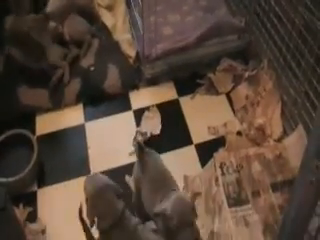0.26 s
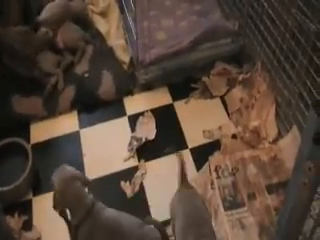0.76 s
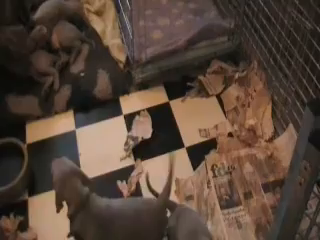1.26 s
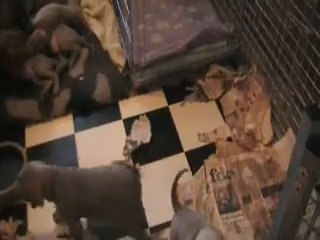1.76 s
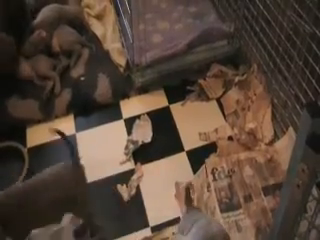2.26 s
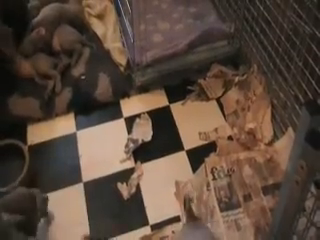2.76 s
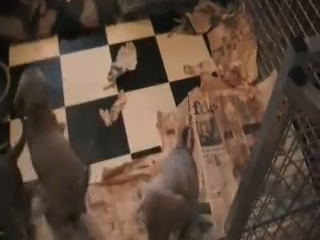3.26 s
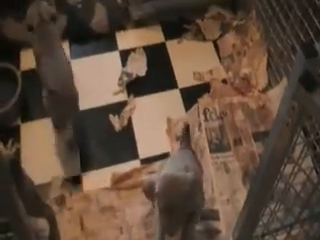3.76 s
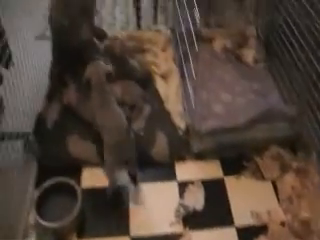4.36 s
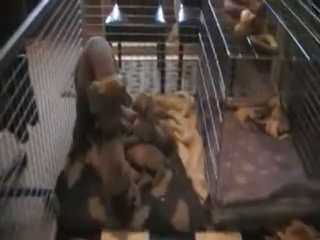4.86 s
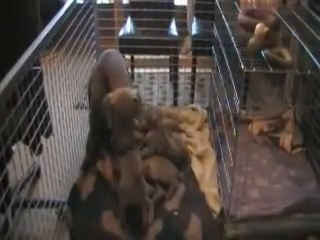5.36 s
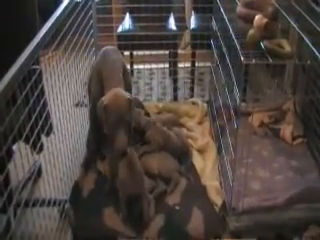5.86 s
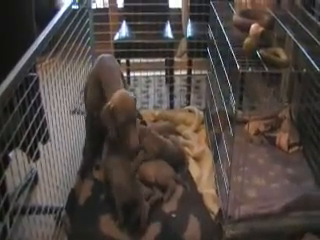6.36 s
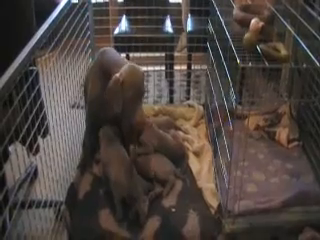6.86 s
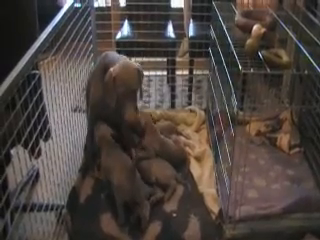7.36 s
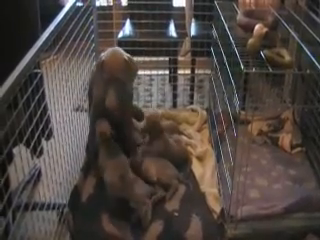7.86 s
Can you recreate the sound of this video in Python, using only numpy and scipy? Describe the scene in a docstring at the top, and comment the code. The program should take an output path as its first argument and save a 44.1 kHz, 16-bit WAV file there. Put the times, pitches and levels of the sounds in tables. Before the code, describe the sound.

Young puppies whine and squeal in short high arches with piercing nasal whistles, while paws rustle newspaper and claws tick on a hard floor.

```python
"""A wire pen on a hard floor in a small room: a litter of puppies whines, heard from just above.
Whines arch in pitch among thin nasal whistles; littermates whimper lower and yowl, all on folds with harmonics
shaped by throat resonances. Moans keep only low harmonics and grunts are irregular flaps of the folds.
Claws tick and bodies thud as decaying noise, newspaper crinkles in clicks, and the wire clangs in ringing modes.
Reflections and a diffuse tail surround them over a steady room tone."""
import sys
import numpy as np
from scipy import signal
from scipy.fft import rfft, irfft
from scipy.io import wavfile
from scipy.ndimage import uniform_filter1d, map_coordinates

SR = 44100
rng = np.random.default_rng(int(sys.argv[2]) if len(sys.argv) > 2 else 0)


def transcribe(u):
    """Save the signal u as a 16-bit wav file named by the first command-line argument.

    u: samples, shape (n,) or (channels, n), limited to [-1, 1]; the rate is SR.
    q: integer samples, one column per channel.
    """
    v = np.clip(np.atleast_2d(u).T, -1, 1)
    q = np.round(v * 32767).astype(np.int16)
    wavfile.write(sys.argv[1], SR, q)


N = 357651
TIME = np.arange(N) / SR

# throat resonances of the lower voices: (frequency [Hz], relative level [dB])
WHIMPER_THROAT = [(1600, 12), (2200, 4.5), (2800, 8), (4000, 9.5), (4900, -6.5), (5800, -29), (9500, -22)]
# spectrum of a hard, light contact: (frequency [Hz], relative level [dB])
CLAW = [(100, -43.5), (300, -20.5), (1000, -15), (2600, 4), (4500, 5.5), (7000, 12), (10000, -5)]
# spectrum of a soft, heavy contact: (frequency [Hz], relative level [dB])
KNOCK = [(60, -17), (150, -8.5), (300, 3.5), (700, 5), (1400, 1), (3000, -2), (8000, -30)]


def undb(db):
    """Decibels to amplitude ratio, 20 dB per decade."""
    return 10 ** (np.asarray(db) / 20)


def unit(x):
    """Normalise the effective value: rms 1."""
    return x / np.sqrt(np.mean(x ** 2) + 1e-20)


def gain_at(hz, points):
    """Gain of a (Hz, dB) spectrum, interpolated in dB on a log-frequency axis."""
    f, db = np.transpose(points)
    return undb(np.interp(np.log(np.maximum(hz, 1)), np.log(f), db))


def colour(x, points):
    """Minimum-phase filtering by a spectrum, causal so that attacks stay sharp; rms 1."""
    size = 4096
    cepstrum = irfft(np.log(gain_at(np.arange(size // 2 + 1) * SR / size, points)))
    # folding the cepstrum onto positive times makes the response causal
    cepstrum[1:size // 2] *= 2
    cepstrum[size // 2 + 1:] = 0
    response = irfft(np.exp(rfft(cepstrum)))
    return unit(signal.fftconvolve(x, response)[:len(x)])


def walk(size, rate):
    """Band-limited random wander: spline through normal draws, rate of them a second, spread near 1."""
    at = np.arange(size) * rate / SR
    draws = rng.standard_normal(int(at[-1]) + 3)
    return map_coordinates(draws, [at], order=2, mode="nearest")


def add(out, start, x):
    """Linear superposition: mix x into out from a start time on."""
    i = max(int(start * SR), 0)
    out[i:i + len(x)] += x[:max(N - i, 0)]


def ease(u):
    """Sine-squared step from 0 to 1, without corners."""
    return np.sin(np.pi / 2 * np.clip(u, 0, 1)) ** 2


def span(length, fade_s):
    """A call's own clock and its smooth on-off gate."""
    t = np.arange(0, length, 1 / SR)
    return t, ease(np.minimum(t, length - t) / fade_s)


def burst(rise, fall, depth_db, fade_s):
    """One push of air: clock, gate and a level that climbs linearly in dB to 0 and dies away."""
    t, gate = span(rise + fall, fade_s)
    return t, gate, -depth_db * np.maximum(1 - t / rise, (t - rise) / fall)


def controls(table, fade_s):
    """Interpolated control curves: start, on-off gate and smoothed columns, sample by sample."""
    s, *columns = np.transpose(table)
    start = s[0] - fade_s / 2
    t, gate = span(s[-1] - s[0] + fade_s, fade_s)
    curves = [np.interp(start + t, s, column) for column in columns]
    return (start, gate, *(uniform_filter1d(curve, size=400, mode="nearest") for curve in curves))


def cycle(hz, jitter, rate):
    """Phase as the integral of a trembling frequency."""
    return 2 * np.pi * np.cumsum(hz * (1 + jitter * walk(len(hz), rate))) / SR


def arch(call, lag, bend, swell_db, sag_db, overtone_share, opening_db, wander, catch, catch_s=0.0088):
    """A cry catches a little sharp, glides to its note, swells, then bends away; the opening mouth brightens it."""
    start, length, rise, fall, swell, first_hz, held_hz, last_hz, db, overtone_db, *voice, rough = call
    t, gate = span(length, fade_s=0.0049)
    climb = ease(t / rise) ** lag
    drop = np.clip(1 - (length - t) / fall, 0, 1) ** bend
    hz = first_hz + (held_hz - first_hz) * climb + (last_hz - held_hz) * drop
    hz = hz * (1 + catch * np.exp(-t / catch_s) + wander * rough * walk(len(t), rate=48))
    effort_db = -swell_db * (1 - ease(t / swell)) - sag_db * drop
    bright_db = overtone_db + overtone_share * effort_db + opening_db * (t / length - .5)
    return (start, gate, hz, db + effort_db, bright_db, *voice, rough)


def scatter(x, spread_s, scatter_db):
    """Directivity: treble is beamed away from the listener and arrives partly off the bars and floor."""
    t = TIME[:SR // 20]
    response = undb(scatter_db) * unit(rng.standard_normal(len(t)) * np.exp(-t / spread_s)) / np.sqrt(len(t))
    response[0] = 1
    return signal.fftconvolve(x, response)[:len(x)] / np.sqrt(np.sum(response ** 2))


def cries(calls, throat, jitter, flutter_db, air_db, width_hz, scatter_db):
    """Source and filter: the folds give a near-sine whose weak overtones slide through throat resonances."""
    middle_range = [(1800, -30), (2300, 0), (5200, 0), (5700, -30)]
    out = np.zeros(N)
    for start, gate, hz, db, overtone_db, second_db, bright_hz, bright_db, rough in calls:
        phase = cycle(hz, jitter * (0.122 + rough), rate=450)
        k = np.arange(3, 15)[:, None]  # harmonic numbers
        resonance = 1 + (undb(bright_db) - 1) / (1 + ((k * hz - bright_hz) / width_hz) ** 4)
        gains = gain_at(k * hz, throat) * resonance
        # the overtones' level is that of their middle range
        gains /= np.sqrt(np.sum((gains * gain_at(k * hz, middle_range)) ** 2, axis=0))
        flutter = undb(flutter_db * np.array([walk(len(hz), rate=56.1) for _ in k]))
        overtones = np.sum(gains * flutter * np.sin(k * phase), axis=0)
        overtones = scatter(overtones, spread_s=0.017, scatter_db=scatter_db)
        # air leaks through once a cycle
        leak = rng.standard_normal(len(hz)) * (1 + np.cos(phase))
        air = undb(air_db) * (0.06 + rough) * colour(leak, throat)
        # in a hoarse call the folds swing unevenly
        shimmer = undb(2.5 * rough * walk(len(hz), rate=240))
        # the second harmonic fades as the folds slacken and the pitch drops
        second = undb(second_db) * (hz / np.median(hz)) ** 0.8 * np.sin(2 * phase)
        body = np.sin(phase) + second
        voice = undb(db) * body + undb(overtone_db) * (overtones + air)
        add(out, start, np.sqrt(2) * gate * shimmer * voice)
    return out


def room_tone(level_db=-61.5):
    """Stationary background: Gaussian noise with a fixed spectrum."""
    # (frequency [Hz], relative level [dB])
    tone_spectrum = [(24, -74), (40, -39), (141, -4.5), (393, -9.5), (597, 0), (809, -23), (1090, 8.5),
                     (1230, -10), (1830, 0), (4330, -11.5), (7230, -48), (9790, -9), (10500, -52),
                     (13600, -67.5), (22000, -120)]
    return undb(level_db) * colour(rng.standard_normal(N), tone_spectrum)


def newspaper(crinkle_rate=450, spread_db=5.0, crinkle_db=2.5, slide_db=5.0, patchy_db=6.5, scuff_db=-2,
              stir_db=-68.5):
    """Friction and crackle: paws slide over paper whose creases snap in tiny clicks (crinkle_rate a second)."""
    # slow shuffles over the newspaper: (time [s], length [s], relative level [dB])
    shuffles = [(0, 0.37, -63), (0.368, 0.56, -55.5), (0.836, 0.55, -56.5), (1.24, .52, -60.5),
                (1.77, 0.11, -52.5), (1.924, 0.33, -57), (2.4, 0.44, -55), (2.807, 0.44, -57.5),
                (3.465, 0.531, -57), (3.99, 0.486, -59.5), (4.238, 0.25, -59.5), (4.74, 0.54, -56.5),
                (5.617, .1, -65), (5.793, 0.63, -63), (6.485, 0.349, -54), (6.84, 0.4, -54.5),
                (7.38, 0.33, -58.5), (7.733, 0.64, -59)]
    # short harder pushes: (time [s], length [s], relative level [dB])
    scuffs = [(0.066, 0.045, -46.5), (0.678, 0.059, -37.5), (1.196, 0.029, -45), (1.784, 0.064, -47.5),
              (2.019, 0.026, -40), (2.067, 0.092, -48), (2.419, 0.075, -47.5), (2.779, 0.0086, -36.5),
              (3.035, 0.043, -47), (3.118, 0.11, -52), (3.269, 0.065, -48), (3.988, 0.142, -42.5),
              (4.553, 0.036, -44.5), (6.42, 0.066, -37.5), (6.917, 0.068, -42.5), (7.234, 0.1, -42.5),
              (7.749, 0.044, -42.5)]
    # paper's spectrum: (frequency [Hz], relative level [dB])
    paper = [(59, -30.5), (100, -32), (206, -21.5), (414, -7), (513, -9), (743, -6.5), (995, -11),
             (1210, -8.5), (3890, -12), (7400, -6), (10500, -24), (13600, -58), (22000, -120)]
    push = np.full(N, undb(stir_db))  # the litter never lies quite still
    for s, length, db in shuffles:
        push += undb(db) * np.sin(np.pi * np.clip((TIME - s) / length, 0, 1))
    for s, length, db in scuffs:
        u = np.clip((TIME - s) / length, 0, 1)
        push += undb(db + scuff_db - slide_db) * np.sqrt(u) * (1 - u) * 1.61
    sizes = undb(spread_db * np.minimum(rng.exponential(size=N), 4))
    snaps = (rng.random(N) < crinkle_rate / SR) * sizes
    decay = np.exp(-1 / (0.00187 * SR))  # each click dies in milliseconds
    crinkle = signal.lfilter([1], [1, -decay], snaps) * rng.standard_normal(N)
    slide = rng.standard_normal(N) * undb(patchy_db * walk(N, rate=35))
    return push * (undb(crinkle_db) * colour(crinkle, paper) + undb(slide_db) * colour(slide, paper))


def yowls():
    """Frequency modulation of the folds: each yowl follows a drawn curve of pitch and level that ends low."""
    # one curve a yowl: (time [s], pitch [Hz], fundamental relative level [dB], overtones relative level [dB])
    curves = [
        [(0.05, 686, -40.5, -49), (0.082, 787, -43, -46), (0.106, 871, -32, -55), (0.138, 768, -50, -48),
         (0.164, 763, -32, -45), (0.19, 754, -38.5, -48), (0.222, 692, -39, -40.5), (0.25, 539, -25.5, -52)],
        [(4.086, 612, -24.5, -49), (4.094, 589.4, -26.5, -36.5), (4.12, 677.3, -34.5, -47.5),
         (4.14, 668, -32.5, -39.5), (4.194, 552.4, -22, -33.5), (4.248, 565, -22, -33.5),
         (4.292, 521, -29.5, -34), (4.316, 518.4, -19.5, -36.5), (4.378, 494, -38, -47.5),
         (4.404, 524.2, -38, -47), (4.415, 497, -40, -47)],
    ]
    # one row a yowl: (second harmonic relative level [dB], bright resonance [Hz], its boost [dB], roughness [ratio])
    voices = [(-20, 3040, 8.5, 0.25), (-15.5, 3630, 14, 0.11)]
    calls = [(*controls(curve, fade_s=0.0093), *voice) for curve, voice in zip(curves, voices)]
    return undb(-1.0) * cries(calls, WHIMPER_THROAT, jitter=.018, flutter_db=3.0, air_db=-20,
                              width_hz=310, scatter_db=-9)


def whistles(jitter=0.005, flutter_db=2, depth_db=15, settle=.3):
    """Aeroacoustic tone: air whistles in the narrowed airway as the folds start or stop; its pitch settles."""
    # (time [s], rise [s], fall [s], first pitch [Hz], last pitch [Hz], relative peak level [dB])
    whistle_calls = [ (.362, 0.011, 0.022, 6470, 6800, -46), (.604, 0.009, 0.056, 6610, 6420, -31),
                     (.883, 0.0243, 0.021, 6517, 6674, -35), (1.113, 0.0236, 0.025, 7440, 6290, -26),
                     (1.332, .03, 0.029, 6530, 6810, -28), (1.557, 0.014, .03, 6830, 6362, -22.5),
                     (1.98, 0.036, .035, 7060, 6540, -34.5), (3.592, 0.01, 0.069, 6930, 6420, -36),
                     (4.262, 0.0235, 0.034, 6540, 6600, -26), (4.3, 0.0094, 0.0073, 6670, 6650, -15.5),
                     (4.319, 0.028, 0.0698, 6770, 6322, -14), (4.87, .045, 0.055, 6575, 6546, -19),
                     (5.157, .017, 0.032, 7120, 6040, -16.5), (5.656, 0.019, .035, 6500, 6514, -25.5),
                     (5.903, 0.01, 0.043, 6830, 6130, -33), (6.112, 0.0072, 0.039, 6550, 6604, -24.5),
                     (6.325, 0.013, 0.042, 6750, 6280, -37.5), (6.505, .012, 0.038, 6170, 6590, -33),
                     (6.915, 0.024, .025, 6300, 6750, -28.5), (7.108, 0.011, 0.012, 6300, 6800, -33.5),
                     (7.365, 0.0115, 0.0406, 6480, 6770, -31), (7.785, 0.03, 0.037, 6900, 6570, -31.5)]
    out = np.zeros(N)
    for start, rise, fall, first_hz, last_hz, peak_db in whistle_calls:
        t, gate, push_db = burst(rise, fall, depth_db, fade_s=0.0028)
        hz = last_hz + (first_hz - last_hz) * np.exp(-t / (settle * (rise + fall)))
        db = peak_db + push_db + flutter_db * walk(len(hz), rate=125)
        add(out, start, np.sqrt(2) * gate * undb(db) * np.sin(cycle(hz, jitter, rate=500)))
    return out


def whines():
    """High voiced harmonics: the pitch arches and the throat's bright resonance picks out overtones."""
    # (time [s], length [s], pitch rise [s], pitch fall [s], swell [s], first, held and last pitch [Hz],
    #  fundamental and overtones relative level [dB], second harmonic relative level [dB],
    #  bright resonance [Hz], its boost [dB], roughness [ratio])
    whine_calls = [ (.372, 0.24, 0.13, 0.045, 0.03, 765, 992.3, 900, -32, -51, -18, 5630, -2, 0.39),
                   (0.891, 0.23, 0.063, 0.027, 0.28, 863, 1044, 1007, -27, -49, -20, 5700, 11.5, 0.22),
                   (1.34, 0.2073, 0.0272, 0.057, 0.083, 976, 1032, 918, -26, -46.5, -25.5, 6440, 1, 0.1),
                   (4.295, 0.033, 0.015, .02, 0.00879, 970, 866, 880, -35, -49, -37, 6500, 1.5, 0.5),
                   (4.921, 0.258, 0.097, 0.15, 0.023, 1037, 1102, 953, -28.5, -60.5, -20.5, 6570, 25, 0.16),
                   (5.675, 0.23, .14, 0.04, 0.16, 1049, 1150, 988, -28.5, -56.5, -16, 6140, 15, 0.01),
                   (6.141, 0.22, 0.062, .09, 0.029, 1110, 1161, 983, -32.5, -57, -16, 6100, 9, 0.36),
                   (6.533, .21, .09, 0.099, 0.016, 1056, 1159, 1012, -30.5, -52.5, -24, 6100, 6, 0.17),
                   (6.954, .165, 0.054, 0.0777, 0.0534, 1190, 1298, 862, -42.5, -54, 2, 6800, 6, 0.77),
                   (7.387, 0.2, .075, .12, 0.042, 1199, 1285, 779, -28.5, -46.5, -11, 7500, -2, 0.12),
                   (7.805, 0.28, 0.072, 0.093, 0.11, 1161, 1242, 1021, -26.5, -45.5, -14.5, 7000, -1, 0.29)]
    # throat resonances: (frequency [Hz], relative level [dB])
    whine_throat = [(2000, -2), (3300, 5.5), (4300, -4.5), (5200, -2), (7000, 5), (8000, 2), (9500, -23)]
    calls = [arch(call, lag=1.1, bend=2.6, swell_db=9, sag_db=8, overtone_share=0.27, opening_db=6,
                  wander=.012, catch=0.0609) for call in whine_calls]
    return undb(-0.5) * cries(calls, whine_throat, jitter=0.017, flutter_db=4.0, air_db=-21.5,
                              width_hz=710, scatter_db=3.5)


def whimpers():
    """Lower voiced harmonics: short glides through the lower throat resonances."""
    # (time [s], length [s], pitch rise [s], pitch fall [s], swell [s], first, held and last pitch [Hz],
    #  fundamental and overtones relative level [dB], second harmonic relative level [dB],
    #  bright resonance [Hz], its boost [dB], roughness [ratio])
    whimper_calls = [ (0.466, .365, 0.2, .06, 0.0164, 577, 683, 649, -29.5, -48.5, -23, 3020, 14, 0.03),
                     (1.055, 0.12, 0.055, 0.0436, 0.078, 464, 631.3, 614, -30.5, -52.5, -15, 3260, 17.5, 0.86),
                     (1.922, 0.0603, 0.068, .02, 0.034, 619, 678, 745, -38, -48, -10.5, 2820, 10, 0.66),
                     (3.53, 0.0345, 0.012, 0.013, 0.0277, 550, 515, 585, -34.5, -55, -12, 3700, 12, 1.14),
                     (3.573, 0.033, 0.011, 0.0298, 0.0059, 640, 707, 657, -43.5, -52.5, -19, 3700, 1, 1.17),
                     (3.765, 0.1192, .07, 0.025, 0.015, 687.7, 773, 763, -42, -52.5, -13.5, 3000, -6, 0.5),
                     (5.985, 0.16, 0.051, 0.057, 0.076, 444.7, 517.6, 613, -32, -51, -8, 3620, 4, 0.4),
                     (6.136, .13, 0.035, 0.033, 0.139, 662, 692, 642, -36, -53, -6.5, 3520, 3, 0.26)]
    calls = [arch(call, lag=2.8, bend=1.8, swell_db=10.5, sag_db=0, overtone_share=0.68, opening_db=7,
                  wander=0.0143, catch=0.0312) for call in whimper_calls]
    return undb(-1.5) * cries(calls, WHIMPER_THROAT, jitter=0.018, flutter_db=5.5, air_db=-20.5,
                              width_hz=445, scatter_db=-22.0)


def grunts(fold_hz=420, jitter=.22, shimmer_db=2.5, air_db=-4, rasp_db=3, depth_db=12):
    """Aperiodic pulse train: slack folds flap irregularly, a low hum with a rasp from the open mouth."""
    # (time [s], rise [s], fall [s], relative peak level [dB], rasp relative level [dB])
    grunt_calls = [(.48, 0.041, 0.15, -33.5, -1.5), (1.561, 0.077, 0.1203, -36, -4),
                   (2.619, 0.0866, .12, -32, -6), (5.973, 0.073, 0.024, -41, -6),
                   (6.456, 0.077, 0.18, -31.5, -3.5)]
    # resonances of the hum: (frequency [Hz], relative level [dB])
    chest = [(200, -75), (310, -3.5), (380, 9), (500, 12.5), (620, 1.5), (900, 1), (2000, -50)]
    # resonances of the rasp: (frequency [Hz], relative level [dB])
    rasp = [(400, -33.5), (620, -4.5), (780, 11.5), (900, 0), (1050, 13.5), (1350, -1.5), (1600, 1),
            (2050, 4.5), (2400, -19.5), (4000, -14.5), (8000, -42.5)]
    out = np.zeros(N)
    for start, rise, fall, peak_db, open_db in grunt_calls:
        _, gate, push_db = burst(rise, fall, depth_db, fade_s=0.024)
        db = peak_db + push_db
        turns = np.floor(cycle(np.full(len(db), fold_hz), jitter, rate=600) / (2 * np.pi))
        pulses = np.diff(turns, prepend=0)  # one a turn
        flaps = unit(pulses * undb(shimmer_db * walk(len(db), rate=130.0)))
        hoarse = flaps + undb(air_db) * rng.standard_normal(len(db))
        voice = colour(flaps, chest) + undb(open_db + rasp_db) * colour(hoarse, rasp)
        add(out, start, gate * undb(db) * voice)
    return out


def taps(claw_t60=0.039, pad_t60=0.07, skid_db=-22, level_db=-25, pad_db=2):
    """Impact excitation: a claw ticks on the floor, skids for an instant, and the pad lands with it."""
    # (time [s], relative level [dB], low knock relative level [dB])
    claw_taps = [(0.6944, -26, -10), (0.9674, -25, -34), (1.1884, -27.5, -8.5), (1.796, -38, -13),
                 (2.0843, -36, -10), (2.3224, -36.5, -7), (2.4397, -35.5, -0.5), (2.5284, -22, -6),
                 (2.614, -43, 4), (2.7388, -27, -1), (2.8725, -31, 0.5), (2.9411, -27.5, -2),
                 (3.2975, -39, 11.5), (3.4757, -33.5, -6.5), (3.511, -32.5, -2), (3.549, -24, -11),
                 (4.0809, -21.5, -11), (4.5523, -37, -10), (5.0517, -27, -26), (5.457, -38.5, -21.5),
                 (5.4917, -36, -21), (5.6411, -23, -7), (6.913, -25, -25), (7.7657, -20, -36)]
    out, t = np.zeros(N), TIME[:SR // 10]
    for s, db, knock_db in claw_taps:
        contact = rng.standard_normal((2, len(t)))
        skid = contact[0] * undb(skid_db - 60 * t / claw_t60)
        claw = colour((t == 0) + skid, CLAW)
        pad = colour(contact[1] * undb(-60 * t / pad_t60), KNOCK)
        add(out, s, undb(db + level_db) * (claw + undb(knock_db + pad_db) * pad))
    return out


def moans(jitter=0.023, waver_db=3, upper_db=-15, tilt_db=-0.5, taper_db=7):
    """Low-pass radiation: the shut mouth lets out the lowest few harmonics; pitch and level bend in an arc."""
    # (time [s], length [s], first, middle and last pitch [Hz], fundamental relative level [dB],
    #  second harmonic relative level [dB])
    moan_calls = [(0.706, 0.32, 868.9, 924, 878, -50.5, -8), (1.986, 0.31, 407.7, 424.4, 361, -50, -21.5),
                  (3.66, 0.37, 483, 445.5, 417.4, -48, -29.5), (3.97, 0.12, 444.8, 476, 460, -52.5, -32),
                  (6.691, .25, 383, 429, 362, -39.5, 1), (7.058, 0.38, 645, 630.6, 621.5, -53.5, -3),
                  (7.538, 0.83, 656, 556, 541, -56.5, -15)]
    out = np.zeros(N)
    for start, length, first_hz, middle_hz, last_hz, db, second_db in moan_calls:
        t, gate = span(length, fade_s=0.01)
        u = 2 * t / length - 1  # -1 to 1 across the moan
        hz = middle_hz + u * (last_hz - first_hz) / 2 + u ** 2 * ((first_hz + last_hz) / 2 - middle_hz)
        phase = cycle(hz, jitter, rate=120)
        upper = sum(undb(upper_db + tilt_db * k) * np.sin(k * phase) for k in range(3, 7))
        tone = np.sin(phase) + undb(second_db) * np.sin(2 * phase) + upper
        level = undb(db - taper_db * u ** 2 + waver_db * walk(len(hz), rate=28))
        add(out, start, np.sqrt(2) * gate * level * tone)
    return out


def bumps(t60=0.049, floor_hz=150, floor_db=-8, level_db=-9):
    """Damped impact: a soft body lands with a dull thud and a low note from the floor."""
    # bodies bumping the bedding: (time [s], relative level [dB])
    landings = [(1.211, -41), (3.139, -32.5), (3.298, -34), (4.808, -45.5), (4.865, -33.5), (4.954, -30),
                (5.122, -52), (5.33, -42.5), (5.53, -61)]
    out, t = np.zeros(N), TIME[:SR // 5]
    for s, db in landings:
        floor = undb(floor_db) * np.sin(2 * np.pi * floor_hz * t)
        thud = colour(rng.standard_normal(len(t)), KNOCK) + floor
        add(out, s, undb(db + level_db - 60 * t / t60) * (1 - np.exp(-t / 0.0038)) * 2 * thud)
    return out


def clangs(ring_db=-17.0, mesh_db=-10, mesh_t60=0.32, rattle_db=-14, rattle_t60=0.17):
    """Modal vibration: the panel chatters on its frame; a few strong modes ring over a blur of weak ones."""
    # blows on the wire: (time [s], relative level [dB], rise time constant [s])
    blows = [(3.701, -29.5, 0.00077), (3.712, -32.5, 0.0019), (3.749, -46, 0.0042), (4.756, -36, 0.072),
             (7.781, -34, 0.00156)]
    # strong modes: (frequency [Hz], relative level [dB], 60 dB decay time [s])
    wire_modes = [(4700, -16, 0.44), (5556, 3.5, 0.32), (5652, 10, 0.33), (6487, -4, 0.21),
                  (6643, -19, 0.3), (7095, 11, 0.11), (7208, -13.5, 0.36), (7600, -4.5, 0.6)]
    # blur of the countless weaker modes: (frequency [Hz], relative level [dB])
    mesh_spectrum = [(150, -53), (400, -10), (1100, -6), (2200, -7), (2900, -17), (4400, -6), (5700, 3),
                     (6300, -3.5), (7400, 12), (8000, -14)]
    out, t = np.zeros(N), TIME[:SR // 2]
    for s, db, rise in blows:
        chatter = undb(4.5 * walk(len(t), rate=450) - 60 * t / rattle_t60)
        rattle = colour(rng.standard_normal(len(t)) * chatter, CLAW)
        blur = undb(4.8 * walk(len(t), rate=120) - 60 * t / mesh_t60)
        mesh = colour(rng.standard_normal(len(t)) * blur, mesh_spectrum)
        ring = unit(sum(undb(mode_db - 60 * t / t60) * np.sin(2 * np.pi * (hz * t + rng.random()))
                        for hz, mode_db, t60 in wire_modes))
        clang = undb(ring_db) * ring + undb(mesh_db) * mesh + undb(rattle_db) * rattle
        add(out, s, undb(db) * (1 - np.exp(-t / rise)) * clang)
    return out


def room(x, tail_db, t60, treble_t60):
    """Reverberation: a few near reflections with a short diffuse tail whose treble dies first."""
    # floor and near walls: (delay [s], relative level [dB])
    echoes = [(.0034, -25), (.0093, -33), (0.0149, -15), (0.0202, -15)]
    t = TIME[:SR // 2]
    noise = rng.standard_normal(len(t))
    low = signal.sosfilt(signal.butter(1, 3000, fs=SR, output="sos"), noise)
    tail = low * undb(-60 * t / t60) + (noise - low) * undb(-60 * t / treble_t60)
    tail *= np.clip(t / 0.0054, 0, 1)
    response = undb(tail_db) * unit(tail) / np.sqrt(len(t))
    response[0] = 1  # direct sound
    for delay, db in echoes:
        response[int(delay * SR)] += undb(db)
    return signal.fftconvolve(x, response)[:N]


def scene():
    """Superposition of all the puppies and their pen in one room, over its tone."""
    voices = yowls() + whistles() + whines() + whimpers() + grunts() + undb(-1.0) * moans()
    pen = newspaper() + taps() + bumps() + clangs()
    return (room(voices + pen, tail_db=-8, t60=0.28, treble_t60=0.12) + room_tone())[None]


def record(dry):
    """Band limiting: a steep elliptic low-pass removes the top of the spectrum."""
    top_hz = 10400
    return signal.sosfilt(signal.ellip(10, .2, 70, top_hz, fs=SR, output="sos"), dry)


dry = scene()
out = record(dry)
transcribe(out)
```